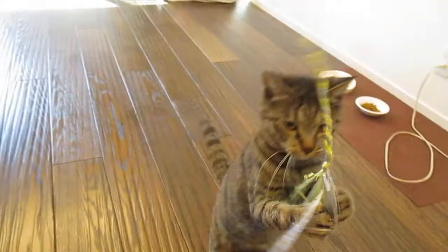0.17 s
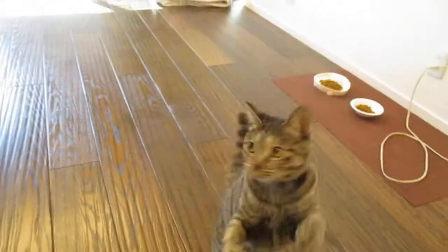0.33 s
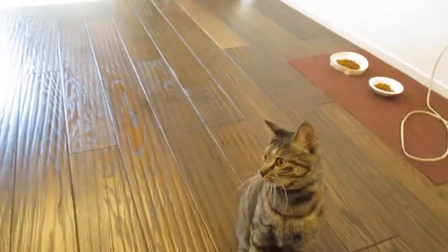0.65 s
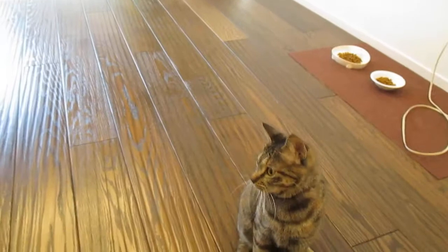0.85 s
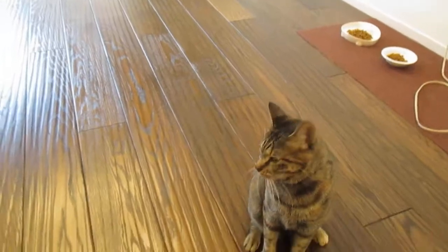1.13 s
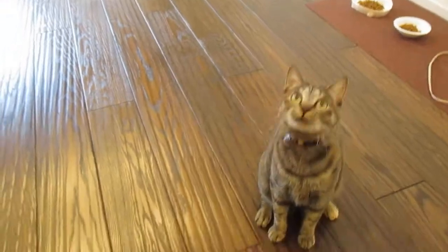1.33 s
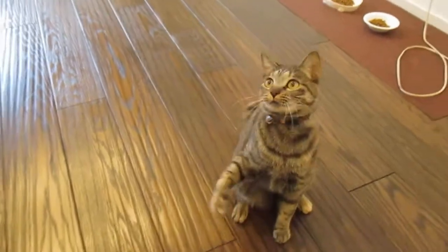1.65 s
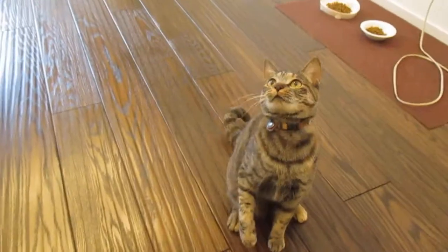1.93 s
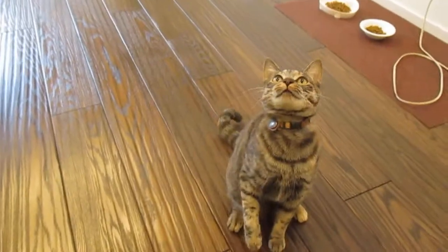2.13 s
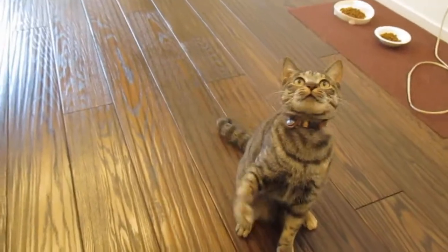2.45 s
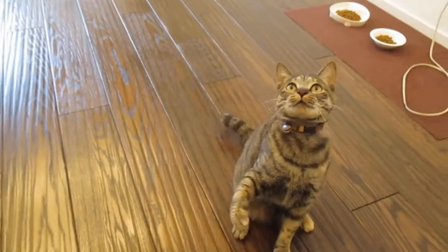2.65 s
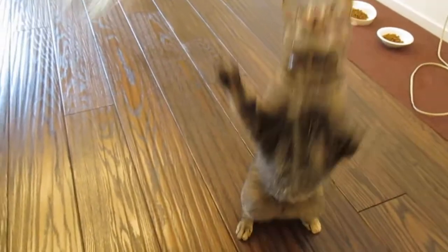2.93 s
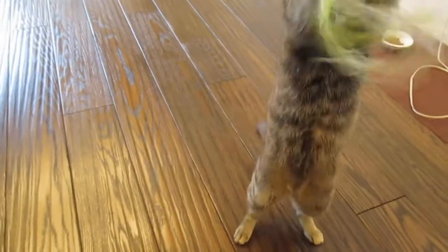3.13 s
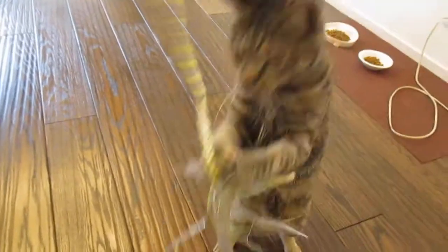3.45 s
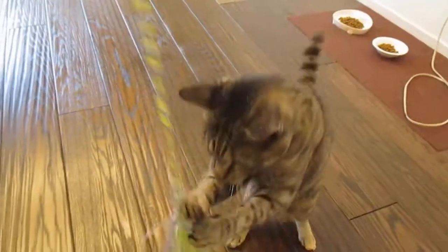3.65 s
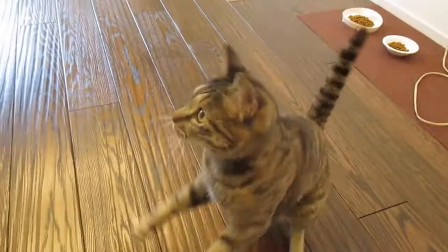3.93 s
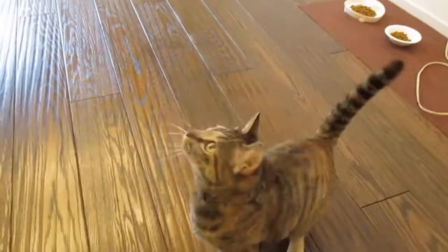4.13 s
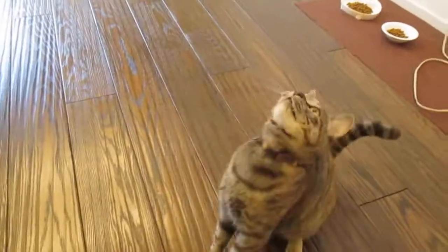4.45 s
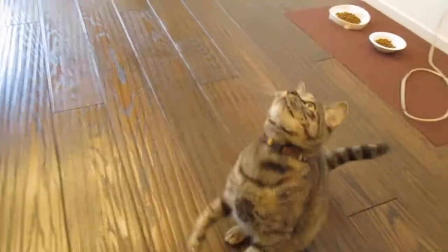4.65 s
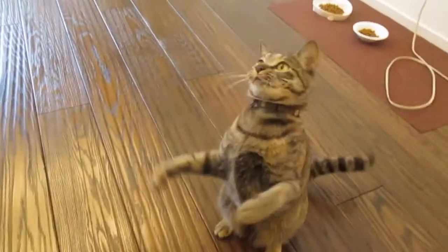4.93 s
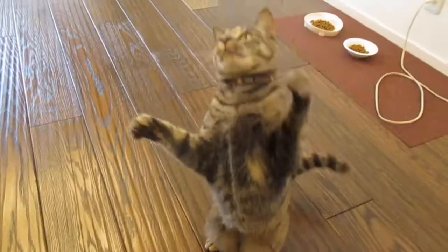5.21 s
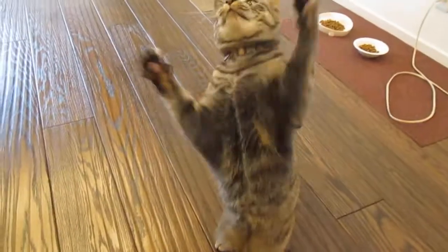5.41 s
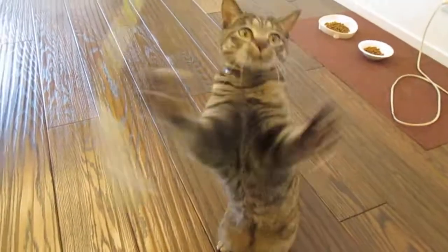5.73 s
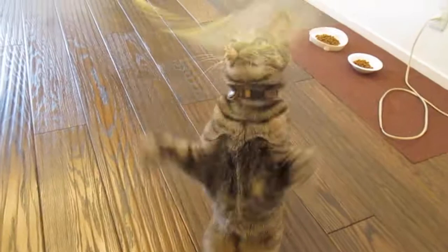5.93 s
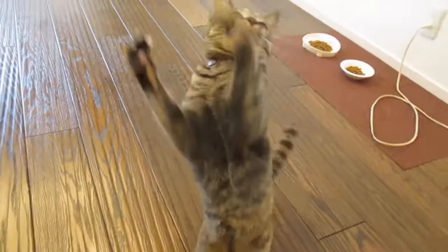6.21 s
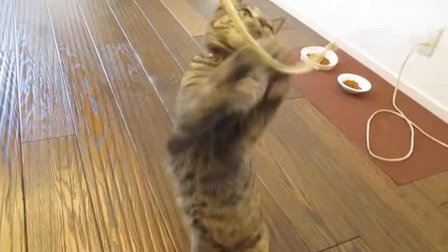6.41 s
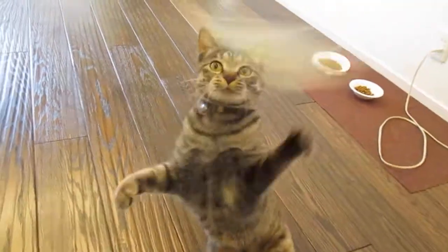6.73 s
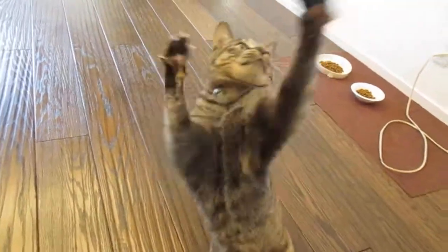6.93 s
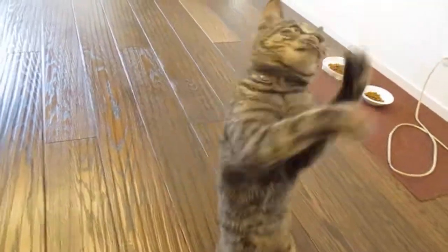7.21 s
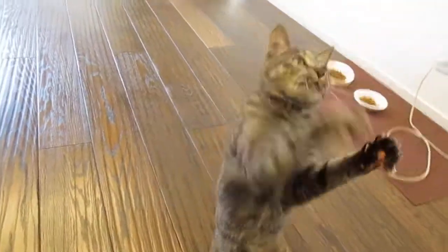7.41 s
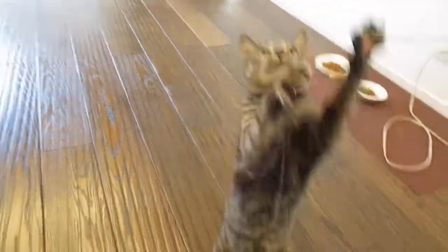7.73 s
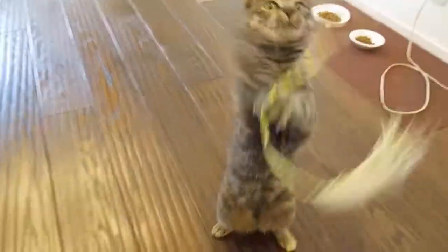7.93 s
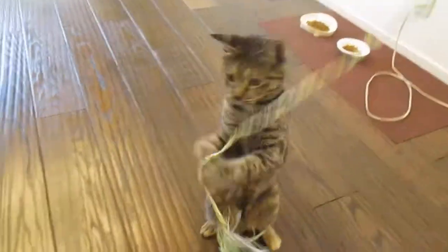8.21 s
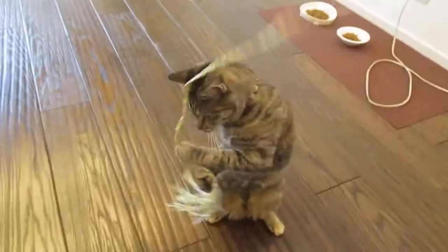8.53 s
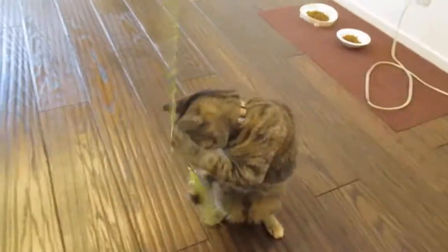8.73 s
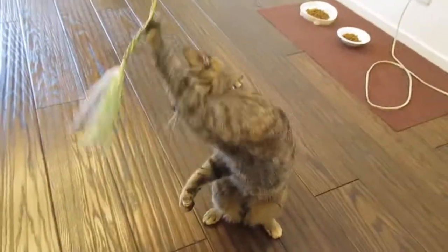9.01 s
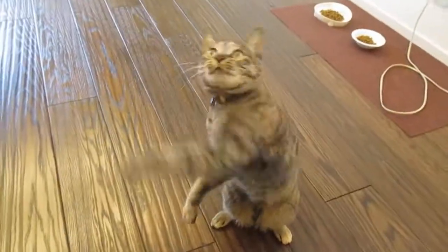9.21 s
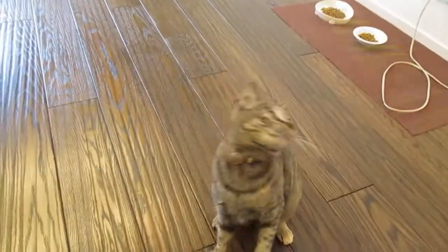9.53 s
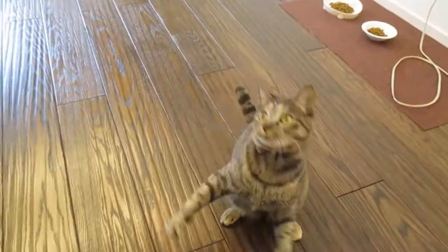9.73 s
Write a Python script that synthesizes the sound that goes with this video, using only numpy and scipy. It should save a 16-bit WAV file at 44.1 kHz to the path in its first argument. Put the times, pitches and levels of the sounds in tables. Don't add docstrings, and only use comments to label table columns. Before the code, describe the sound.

A plastic-strand tassel toy swishes and crackles in quick bursts as a cat swats it, claws ticking and paws thumping on a hardwood floor.

```python
import sys
import numpy as np
from scipy import signal
from scipy.fft import rfft, irfft, next_fast_len
from scipy.io import wavfile
from scipy.ndimage import uniform_filter1d, map_coordinates

SR = 44100
rng = np.random.default_rng(int(sys.argv[2]) if len(sys.argv) > 2 else 0)


def unload_audio(sound):
    columns = np.transpose(np.atleast_2d(sound))
    steps = np.round(np.clip(columns, -1, 1) * 32767)
    wavfile.write(sys.argv[1], SR, steps.astype(np.int16))


def voltage_ratio(decibels):
    exponent = np.asarray(decibels, float) / 20
    return 10 ** exponent


N = 434826
TIME = np.arange(N) / SR

# peak_s, level_db, rise_ms_per_6db, fall_ms_per_6db
FLICK_MOVES = [(.051, -31.5, 5, 14), (.072, -39, 10, 9), (1.068, -44, 14, 14), (.205, -40, 19, 37),
               (.976, -42, 26, 16), (1.1, -41.5, 37, 9), (1.292, -43.5, 48, 43), (1.519, -35, 3.5, 35),
               (1.756, -37.5, 14, 53), (2.228, -32.5, 13, 14), (2.472, -31.5, 17, 16),
               (2.762, -34.5, 14, 16), (4.359, -30.5, 17.5, 22), (4.711, -35.5, 17.5, 19),
               (5.575, -38.5, 27, 36), (6.693, -43.5, 14, 27), (7.22, -44, 26, 66), (7.523, -49, 45.5, 86),
               (7.849, -43.5, 40, 46), (8.422, -50, 18, 25), (9.061, -35.5, 4, 18)]
# peak_s, level_db, rise_ms_per_6db, fall_ms_per_6db
WHIP_MOVES = [(.421, -39, 4, 68), (.525, -34, 12, 7), (.573, -40.5, 7, 12), (.613, -36.5, 10, 27),
              (1.988, -40.5, 18, 23), (3.066, -24.5, 8, 7), (3.047, -33, 10, 10), (6.2645, -25.5, 2, 3),
              (3.598, -50.5, 13, 7), (3.653, -44, 23, 15), (5.919, -40.5, 16.5, 43), (7.087, -29, 8, 15),
              (6.065, -56, 4, 7), (6.42, -50, 40, 55), (6.9, -55, 12, 20), (8.75, -52.5, 24, 35),
              (1.84, -46, 25, 25)]
# peak_s, level_db, rise_ms_per_6db, fall_ms_per_6db
SWEEP_MOVES = [(.312, -44, 24, 18), (.765, -37, 25, 25), (.802, -37, 18, 28), (2.087, -42.5, 22, 22),
               (2.316, -34, 17, 15), (2.589, -35.5, 12, 22), (2.839, -40.5, 13, 30), (3.724, -42.5, 17, 30),
               (4.063, -45, 22, 58), (4.199, -27.5, 7.5, 17), (4.518, -36, 20, 18.5),
               (4.817, -35, 11.5, 25), (4.969, -32.5, 12.5, 16), (5.115, -42.5, 28, 21),
               (5.375, -38.5, 20, 40), (5.682, -47.5, 54, 34), (6.012, -47.5, 37, 14),
               (8.139, -50.5, 24, 61), (9.518, -44.5, 34, 74)]
# start_s, level_db, build_ms, fall_ms_per_6db
SLAP_MOVES = [(.395, -37, 3.5, 4), (.7185, -39, 7, 25), (1.4867, -36, 5, 20), (3.018, -19.5, 3.8, 3.5),
              (3.1245, -31.5, 2.5, 3), (3.131, -35, 3, 2), (3.2142, -31, 3.2, 15), (4.9485, -35.5, 4, 5),
              (6.2587, -32, 3, 18), (6.3096, -24.5, 2, 2), (6.318, -36, 6, 22), (6.5215, -39, 4.7, 4),
              (7.042, -26.5, 4.9, 5), (7.074, -35, 1.5, 3), (7.3195, -29, 2.6, 14), (7.6243, -41, 4, 23),
              (9.3495, -37.5, 5.6, 35)]
# start_s, level_db, fall_ms_per_6db
GRAZE_MOVES = [(.309, -46, -1), (3.475, -47, 40), (3.505, -52, 20), (3.628, -49.5, 20), (4.0378, -47, 10),
               (4.8025, -44, 4), (5.322, -45, 15), (5.3455, -42, 10), (5.502, -47, 25), (6.535, -46, 5),
               (8.0959, -52, 5), (8.641, -53, 9), (8.6499, -49.5, 46), (4.179, -42, 15), (7.292, -40, 29),
               (8.376, -55, 25), (7.195, -48, 18), (1.947, -44, 15), (1.1, -46, 30), (9.85, -52, 17),
               (4.34, -40, 12), (9.046, -46, 10), (9.298, -53, 25), (9.329, -48, 25), (1.734, -46, 15),
               (2.998, -45, 25), (4.187, -37, 8), (6.205, -52, 30), (1.21, -50, 30)]
GRAZE_BUILD_MS = 7.2
# air_swish_db, brightness_db
FLICK_COLOUR, WHIP_COLOUR, SWEEP_COLOUR = (-11, -0.3), (-11.5, 4.9), (-7.5, 1.2)
SLAP_COLOUR, GRAZE_COLOUR = (-12, 3), (-10.5, 2.1)
SETTLE_DB, SETTLE_MS, SETTLE_AIR_DB = -20.5, 75, -9
STIR_AIR_DB = -11.5
# time_s, level_db
CORD_STIR = [(0, -40.5), (.3, -58), (.85, -52.5), (1.95, -53), (2.4, -50.5), (2.83, -56), (2.97, -47),
             (3.45, -68), (4.05, -62), (4.9, -52.5), (5.55, -61), (5.75, -66), (6.1, -51.5), (6.6, -56.5),
             (6.9, -51.5), (7.45, -59), (9, -66), (9.86, -59.5)]
# frequency_hz, density_db_per_hz
STRAND_SPECTRUM = [(1180, -8), (2000, -6), (2120, -12.5), (2300, -5.5), (2850, -2.5), (4130, -3),
                   (8510, 1.5), (12100, -2.5), (15700, -11)]
# frequency_hz, density_db_per_hz
SWISH_SPECTRUM = [(90, -42), (200, 3), (600, -0.5), (1200, -5), (2300, -5), (3500, -23), (6000, -39)]
# time_s, peak_db, pitch_hz
CLAW_TICKS = [(.2376, -19.5, 8500), (.0505, -22, 7000), (.0537, -23, 9000), (.3998, -23.5, 9080),
              (.6849, -29, 10080), (.7748, -16.5, 6800), (1.4873, -22, 10500), (1.7807, -24.5, 8510),
              (1.9488, -28.5, 9940), (3.0184, -16, 8000), (3.0204, -12, 8800), (3.0228, -9, 6400),
              (3.0656, -17, 8600), (3.0705, -22, 8000), (3.7012, -17.5, 8800), (3.8744, -43.6, 9680),
              (4.806, -23, 8850), (6.3114, -17, 8900), (6.6351, -35.4, 8610), (7.0747, -18, 7080),
              (7.2178, -29, 7900), (7.8497, -29, 7720), (8.9169, -46.4, 8660), (9.0201, -22, 10900),
              (9.2525, -40.5, 8350)]
# time_s, peak_db, pitch_hz
TIP_SNAPS = [(.4117, -24.4, 11330), (.4556, -25.7, 10160), (.5832, -25.5, 8700), (.648, -24, 9580),
             (.6585, -25.5, 9030), (1.4473, -33.7, 4100), (1.5381, -18.6, 8110), (3.0295, -9.6, 9030),
             (3.3387, -38.5, 8280), (3.4037, -38.3, 8030), (3.7608, -33, 7990), (3.575, -42, 12500),
             (3.612, -41, 13000), (3.676, -41, 12500), (3.629, -40, 5200), (3.9505, -40, 9500),
             (3.9556, -35.5, 9300), (1.186, -38, 9500), (1.228, -35, 7000), (6.144, -40, 7500),
             (5.2082, -40, 7810), (5.7729, -31, 8830), (6.0514, -15, 9380), (6.2431, -32.7, 8440),
             (6.5371, -19, 10500), (6.5383, -24, 8000), (7.0648, -22.7, 8480), (7.6255, -22.5, 8310),
             (8.3507, -46.6, 10120), (8.569, -41.7, 9590), (8.9839, -37.7, 10500), (9.0232, -33, 9500),
             (9.0287, -33.3, 9610), (9.0315, -33, 11000), (9.1608, -34.6, 10970), (9.2945, -27.3, 8880),
             (9.3203, -38, 13500)]
# sharpness of pitch, wood_knock_db
CLAW, TIP = (3.3, -19), (4.8, -33)
# start_s, peak_db, pitch_hz
PAW_PATS = [(.263, -31, 76.5), (.32, -38, 85), (.368, -34, 55.3), (.77, -39.5, 144), (1.52, -34.5, 196),
            (2.214, -36, 130), (2.3145, -26, 600), (2.308, -34, 65), (1.751, -35, 62), (2.468, -39, 205),
            (2.585, -28.5, 190), (2.584, -36, 62), (2.5925, -32, 170), (2.77, -40, 70), (3.06, -34, 248),
            (4.094, -29.5, 105), (4.113, -32.5, 100), (4.13, -33, 95), (4.15, -38, 99), (4.199, -25, 1720),
            (.79, -40, 120), (.06, -42, 119.4), (4.219, -26, 480), (4.346, -31, 130), (4.366, -34, 210),
            (4.998, -38, 430), (5.39, -46, 150), (6.82, -40, 47), (6.88, -40, 48.4), (6.56, -42, 48),
            (7.0428, -30, 514)]
# start_s, peak_db, pitch_hz
PAW_STAMPS = [(2.3095, -23, 1150), (2.4705, -26, 340), (.7725, -30, 280), (4.1948, -16, 122),
              (4.2025, -23, 430), (4.8095, -31, 95), (4.812, -31, 231), (4.965, -32, 90),
              (4.9652, -27, 270), (4.9665, -20, 520), (4.97, -20, 755), (7.0827, -31, 280),
              (4.197, -16, 1340), (4.222, -25, 1000), (4.8135, -23, 610), (4.815, -30, 1200),
              (4.968, -22, 1100), (7.322, -32, 200)]
# start_s, peak_db, pitch_hz
KNOT_RAPS = [(.046, -30, 1210), (.051, -34, 930), (.2, -43, 1080), (3.0181, -32, 890), (.7745, -31, 3200),
             (3.0685, -30, 2600), (4.1995, -25, 1100), (4.2005, -27, 1900), (.204, -38, 3600),
             (.057, -33, 4000), (8.098, -46, 1750), (4.966, -31, 1900), (4.71, -38, 1400),
             (3.0195, -26, 1800), (3.021, -24, 2920), (3.022, -20, 5170), (6.312, -33, 1660),
             (7.047, -37, 960), (7.322, -34, 1740), (4.198, -19.5, 2380), (3.064, -29, 3200),
             (7.045, -28, 3020), (7.321, -27, 3170)]
PAT_CYCLES, STAMP_CYCLES, RAP_CYCLES = 0.98, 0.73, 3.5
# time_s, floor_echo_share (0-1)
FLOOR_NEARNESS = [
    (0, 0),
    (3.44, 0),
    (3.48, .4),
    (3.6, .7),
    (3.78, .7),
    (3.86, 0),
    (9.0, 0),
    (9.012, .6),
    (9.03, .6),
    (9.045, 0),
]
BOUNCE_MS = .227
# frequency_hz, t60_s
ROOM_DECAY = [(200, .5), (2000, 0.78), (8000, 0.42), (16000, 0.17)]
# multiple of mains, level_db
HUM_HARMONICS = [(2, -62.5), (3, -58), (4, -55.5), (5, -66), (6, -62.5), (7, -52), (8, -65.5), (9, -67.5),
                 (10, -68), (11, -65)]
MAINS_HZ = 59.9
HUM_SMEAR_RAD = .36
# frequency_hz, density_db_per_hz
HOUSE_SPECTRUM = [(12, -26), (25, 2), (33, -3), (50, 2.5), (110, 0.5), (250, -4.5), (450, -6.5),
                  (750, -12.5), (1400, -19), (4000, -25), (9000, -30), (15700, -53)]
# peak_s, level_db, slope_ms_per_6db
FLOOR_JOLTS = [(.08, -50.5, 200), (.35, -44, 80), (.62, -50.5, 200), (1.58, -48.5, 120), (2.33, -45, 72),
               (2.9, -50, 298), (4.21, -37.5, 39), (4.12, -51, 58), (4.5, -51, 200), (4.85, -50.5, 200),
               (6.8, -55, 250), (6.45, -52, 80), (7.33, -50, 60), (3.08, -49, 70), (3.65, -53, 100),
               (7.06, -51, 50), (9.05, -57, 100), (9.6, -55, 250)]
RUMBLE_DB = -57.5
TOP_HZ = 15770


def unit(x):
    return x / np.sqrt(np.mean(x ** 2) + 1e-20)


def along(points, hz):
    f, v = np.transpose(points)
    return np.interp(np.log(hz + 1), np.log(f + 1), v)


def curves(rows):
    s, *cols = np.transpose(rows)
    return [np.interp(TIME, s, c) for c in cols]


def wobble(rate):
    return map_coordinates(rng.standard_normal(N // 64), [TIME * rate])


def filtered(x, response):
    m = next_fast_len(N + SR // 2)
    return irfft(rfft(x, m) * response(np.fft.rfftfreq(m, 1 / SR)), m)[:N]


def add(track, s, sound):
    part = track[max(round(s * SR), 0):][:len(sound)]
    part += sound[:len(part)]


def crinkle(share, spread_db, clump_db, patchy_db):
    z = signal.stft(rng.standard_normal(N), nperseg=256)[2]
    field = uniform_filter1d(rng.standard_normal(z.shape), size=10, axis=0)
    field = uniform_filter1d(field, size=9, axis=1)
    hiss = signal.istft(z * voltage_ratio(patchy_db * unit(field)), nperseg=256)[1][:N]
    snaps = np.zeros(N)
    for hz in (2600, 4360, 7940, 10400, 13500):
        size = voltage_ratio(spread_db * np.minimum(rng.exponential(size=N), 3))
        kicks = (rng.random(N) < .006) * rng.choice([-1, 1], size=N) * size
        snaps += filtered(kicks, lambda f: 1j * f * .55 * hz / (hz * hz - f * f + 1j * f * .55 * hz))
    share = np.clip(share, 0, 1)
    mix = np.sqrt(1 - share) * unit(hiss) + np.sqrt(share) * unit(snaps)
    clumps = voltage_ratio(clump_db * (wobble(170) + 0.17 * wobble(45)))
    return unit(mix * clumps)


def tassel():
    stir = voltage_ratio(2 * curves(CORD_STIR)[0])
    dull, bright, air = stir.copy(), stir.copy(), stir * voltage_ratio(2 * STIR_AIR_DB)
    lead_s = .25
    ms = 1000 * np.arange(-SR // 4, SR // 2) / SR

    def swell(rise, fall):
        return np.where(ms < 0, ms / max(rise, 1), -ms / max(fall, 1))

    def jump(build, fall):
        onset = np.minimum(2 * ms, 0) + .6 * (ms / build - 1)
        return np.where(ms < build, onset, (build - ms) / max(fall, 1))

    after = voltage_ratio(2 * SETTLE_DB - 12 * ms / SETTLE_MS) * np.clip(ms / 10, 0, 1)
    grazes = [(s, db, GRAZE_BUILD_MS, fall) for s, db, fall in GRAZE_MOVES]
    kinds = [(FLICK_MOVES, FLICK_COLOUR, swell), (WHIP_MOVES, WHIP_COLOUR, swell),
             (SWEEP_MOVES, SWEEP_COLOUR, swell), (SLAP_MOVES, SLAP_COLOUR, jump), (grazes, GRAZE_COLOUR, jump)]
    for moves, (swish_db, tilt_db), shape in kinds:
        for s, db, rise, fall in moves:
            early = max(round((lead_s - s) * SR), 0)
            power = voltage_ratio(2 * (db + 6 * shape(rise, fall)))[early:]
            settle = voltage_ratio(2 * db) * after[early:]
            add(dull, s - lead_s, power * voltage_ratio(2.2 - tilt_db) + settle)
            add(bright, s - lead_s, power * voltage_ratio(tilt_db - 2.2) + settle)
            add(air, s - lead_s, power * voltage_ratio(2 * swish_db) + settle * voltage_ratio(2 * SETTLE_AIR_DB))
    strands = unit(filtered(crinkle(0.36, 2.3, 1.15, 2.2), lambda hz: voltage_ratio(along(STRAND_SPECTRUM, hz))))
    upper = filtered(strands, lambda hz: 1 / (1 + (7500 / (hz + 1)) ** 4))
    lower = strands - upper
    swish = unit(filtered(crinkle(0.043, 2.3, 1.3, 2.4), lambda hz: voltage_ratio(along(SWISH_SPECTRUM, hz))))
    return np.sqrt(dull) * lower + np.sqrt(bright) * upper + voltage_ratio(2.0) * np.sqrt(air) * swish


def claws():
    out, t = np.zeros(N), np.arange(-44, 260) / SR
    ticks = [(*row, *CLAW) for row in CLAW_TICKS] + [(*row, *TIP) for row in TIP_SNAPS]
    for s, db, hz, sharp, knock_db in ticks:
        life = max(sharp, 1) / (9 * hz)

        def wavelet(late):
            return np.sin(2 * np.pi * hz * (t - late)) * np.exp(-.5 * ((t - late) / life) ** 2)

        echo = .5 * wavelet(0.00051 + 0.000554 * rng.random())
        band = [1, -1.2 * np.cos(2 * np.pi * hz / SR), .36]
        noise = signal.lfilter([1, 0, -1], band, rng.standard_normal(len(t)))
        rattle = 0.2 * (t > 0) * voltage_ratio(-60 * t / 0.0048) * noise
        knock = voltage_ratio(knock_db + 17) * (t > 0) * voltage_ratio(-60 * t / 0.00072) * np.sin(2 * np.pi * 2100 * t)
        tick = wavelet(0) + echo + rattle + knock
        add(out, s + t[0], voltage_ratio(db) * tick / np.abs(tick).max())
    return out


def paws():
    out, t = np.zeros(N), np.arange(SR // 4) / SR
    kinds = [(PAW_PATS, PAT_CYCLES), (PAW_STAMPS, STAMP_CYCLES), (KNOT_RAPS, RAP_CYCLES)]
    for rows, cycles in kinds:
        for s, db, hz in rows:
            u = t * hz / cycles
            overtone = np.sin(2 * np.pi * 2.31 * hz * t + 5.8 * rng.random()) * np.exp(-.6 * u)
            board = np.sin(2 * np.pi * hz * t) + .5 * overtone
            add(out, s, voltage_ratio(db) * 2.01 * u * np.exp(-1.4 * u) * board)
    return out


def floor_bounce(x):
    share = curves(FLOOR_NEARNESS)[0]
    return (x + share * np.roll(x, round(BOUNCE_MS * SR / 1000))) / np.sqrt(1 + share ** 2)


def room(x, block=8192):
    out = np.zeros(N)
    for start in range(0, N, block):
        hz, t, z = signal.stft(rng.standard_normal(SR // 3), SR, nperseg=256)
        decay = voltage_ratio(-60 * t / along(ROOM_DECAY, hz)[:, None])
        tail = signal.istft(z * decay, SR, nperseg=256)[1]
        wet = signal.fftconvolve(x[start:start + block], tail / np.linalg.norm(tail))
        add(out, start / SR + .004, wet)
    return out


def appliance():
    cycle = 2 * np.pi * MAINS_HZ * TIME
    hum = np.zeros(N)
    for k, db in HUM_HARMONICS:
        phase = k * cycle - HUM_SMEAR_RAD * k * k + np.pi
        hum += np.sqrt(2) * voltage_ratio(db + .6 * wobble(3)) * np.cos(phase)
    return hum


def house():
    air = filtered(rng.standard_normal(N),
                   lambda hz: voltage_ratio(along(HOUSE_SPECTRUM, hz)) / (1 + (90 / (hz + 1)) ** 4))
    low = filtered(rng.standard_normal(N),
                   lambda hz: voltage_ratio(along(HOUSE_SPECTRUM, hz)) / (1 + (hz / 100) ** 4))
    power = np.full(N, voltage_ratio(2 * RUMBLE_DB))
    for s, db, ms in FLOOR_JOLTS:
        power += voltage_ratio(2 * db - 12000 * np.abs(TIME - s) / ms)
    return voltage_ratio(-53.5) * unit(air) + np.sqrt(power) * voltage_ratio(1.2 * wobble(28)) * unit(low)


def scene():
    bright, thuds = floor_bounce(tassel() + claws()), paws()
    thuds_to_room = voltage_ratio(-1) * filtered(thuds, lambda hz: 1 / (1 + (220 / (hz + 1)) ** 2))
    reverb = voltage_ratio(-9.5) * room(bright + thuds_to_room)
    return (bright + thuds + reverb + appliance() + house())[None]


def band_limit(x):
    return signal.sosfilt(signal.butter(12, 16650, fs=SR, output="sos"), x)


def record(dry):
    mix = filtered(dry[0], lambda hz: hz < TOP_HZ)[None]
    return band_limit(mix)


dry = scene()
out = record(dry)
unload_audio(out)
```